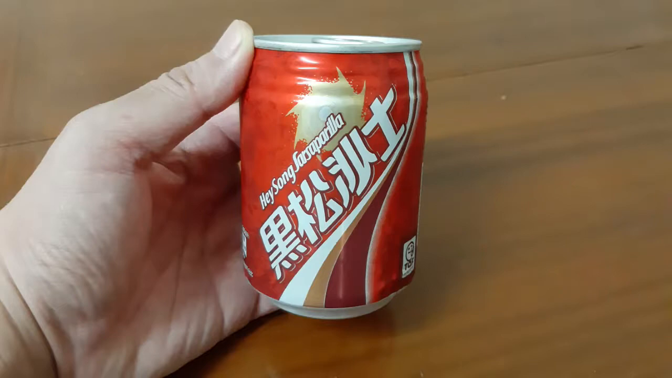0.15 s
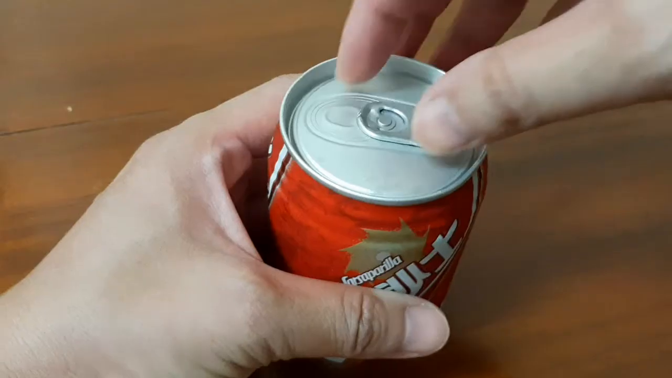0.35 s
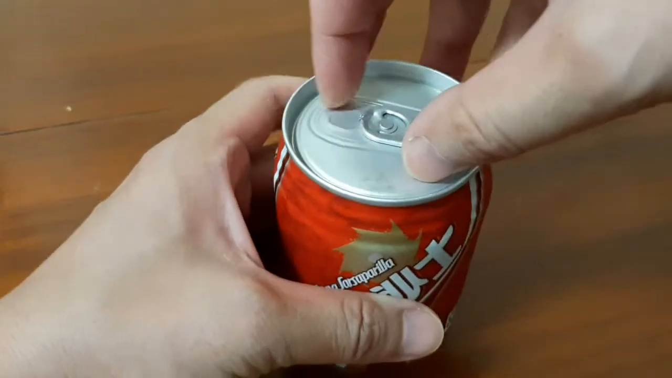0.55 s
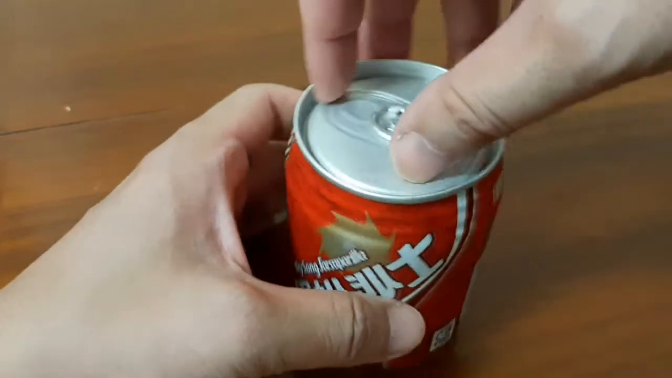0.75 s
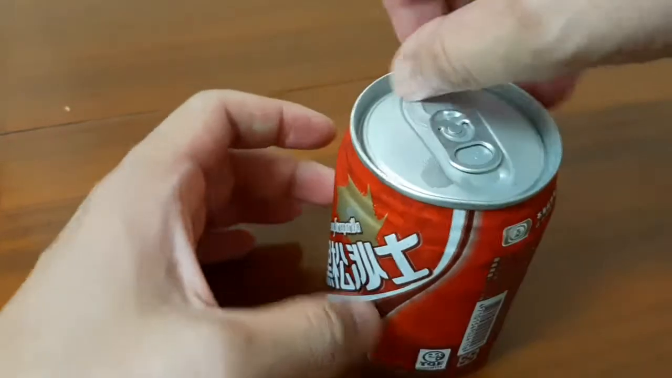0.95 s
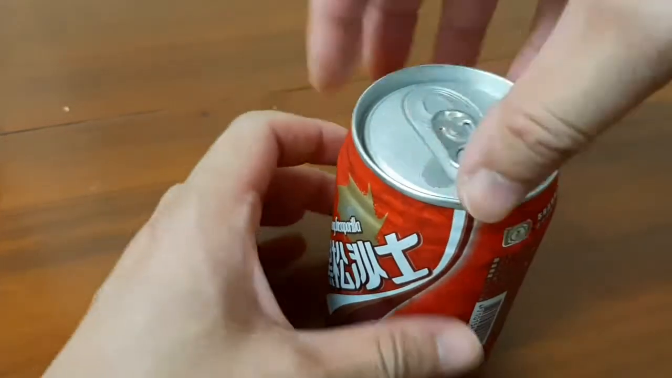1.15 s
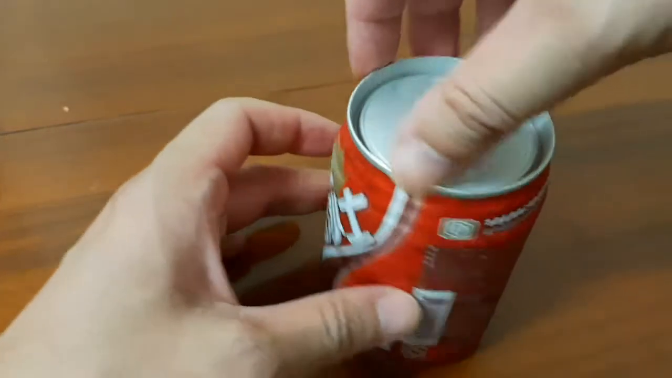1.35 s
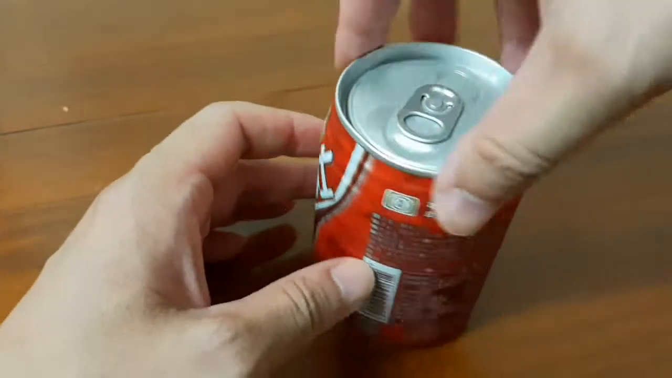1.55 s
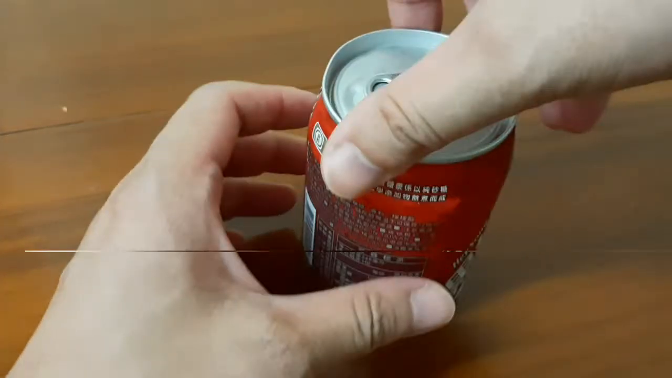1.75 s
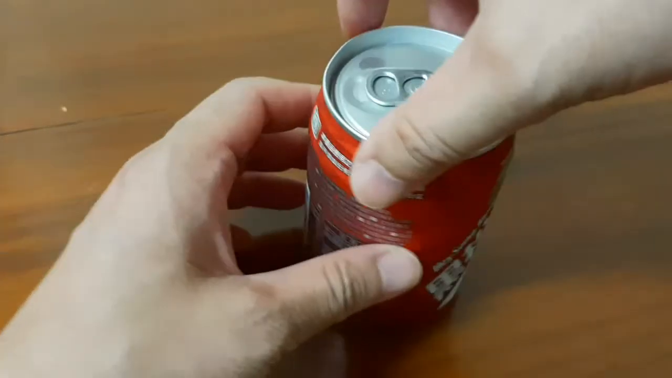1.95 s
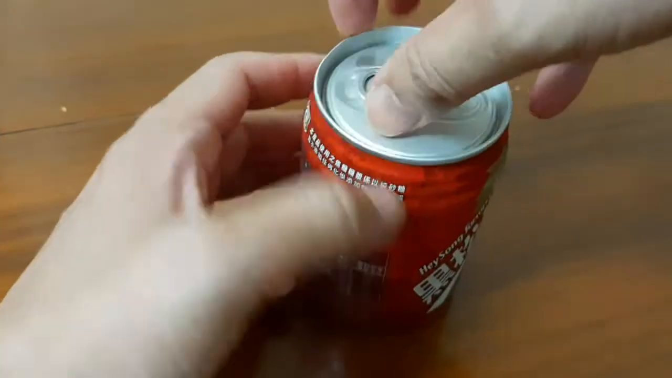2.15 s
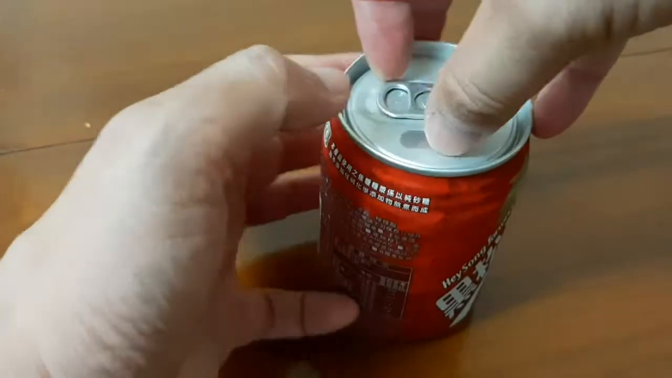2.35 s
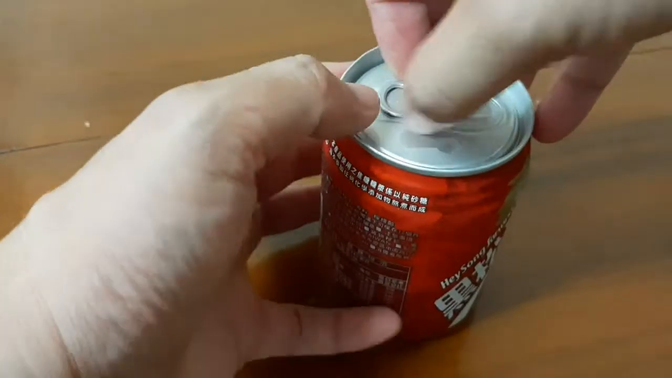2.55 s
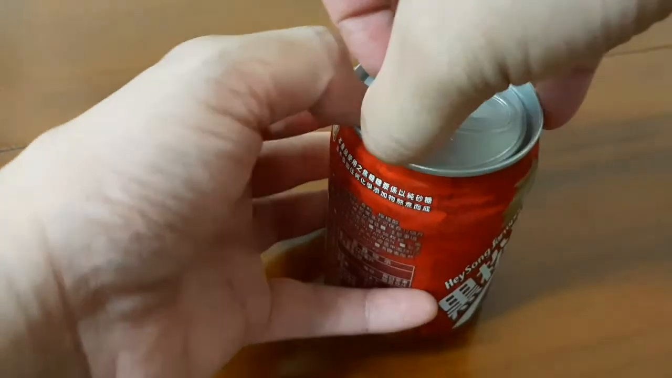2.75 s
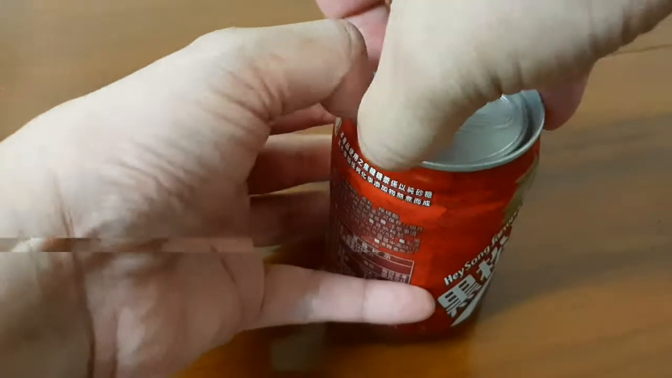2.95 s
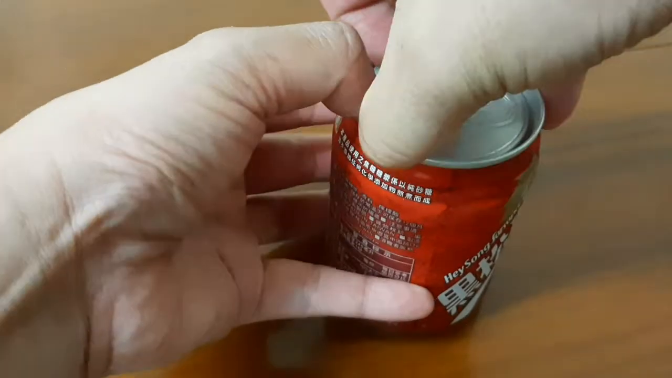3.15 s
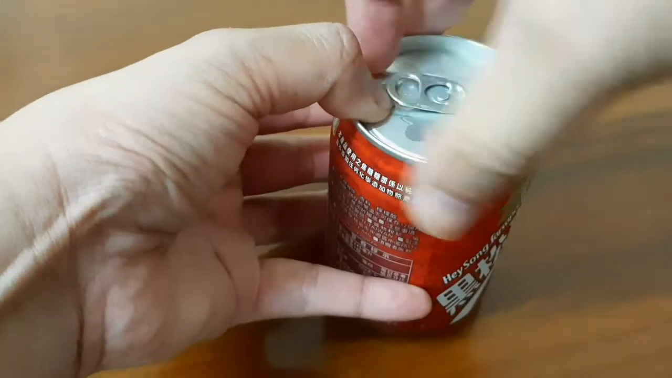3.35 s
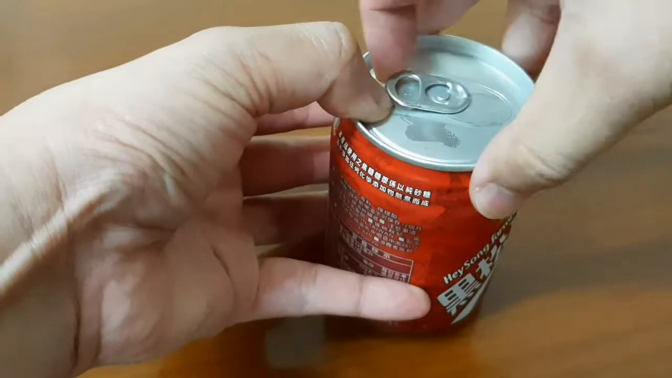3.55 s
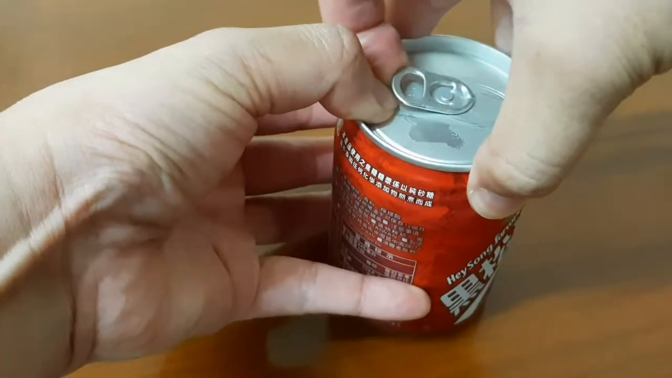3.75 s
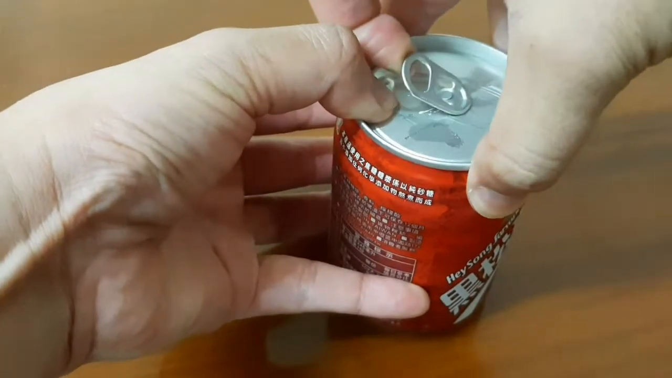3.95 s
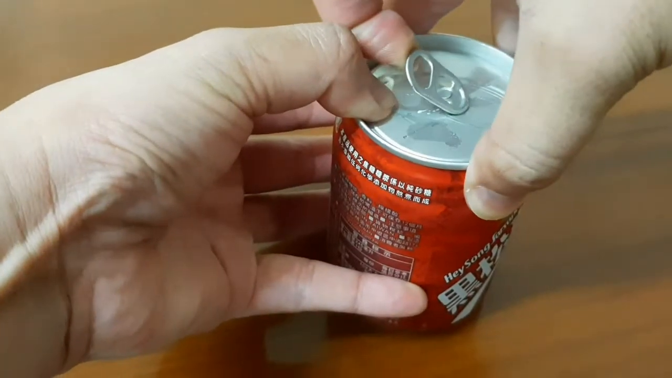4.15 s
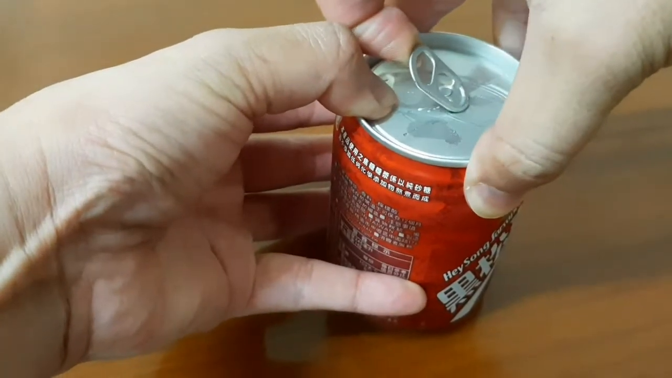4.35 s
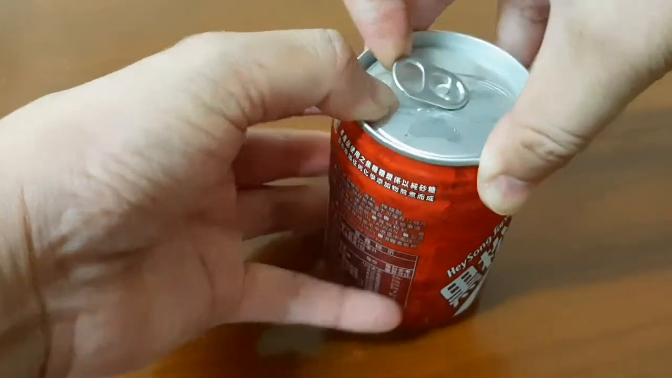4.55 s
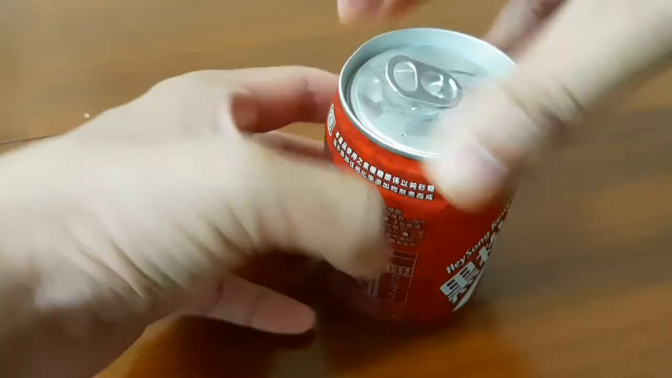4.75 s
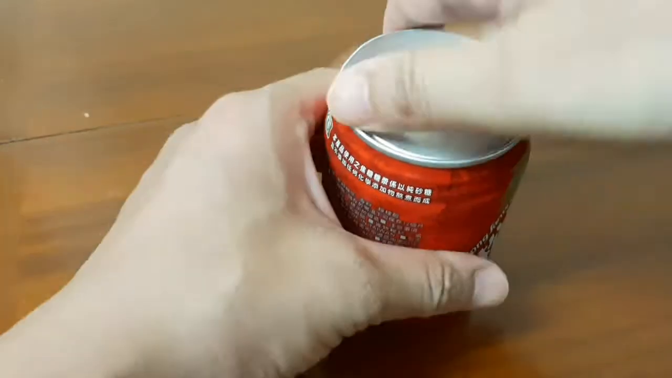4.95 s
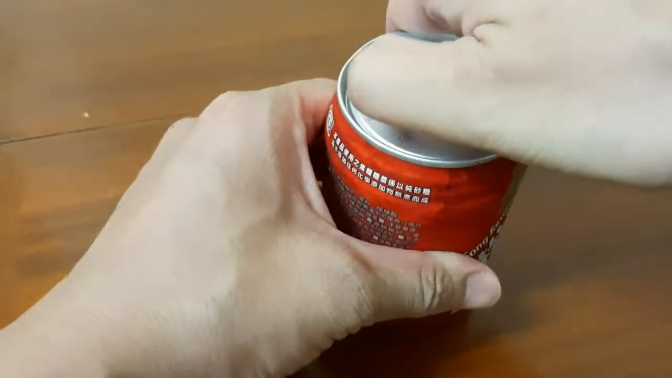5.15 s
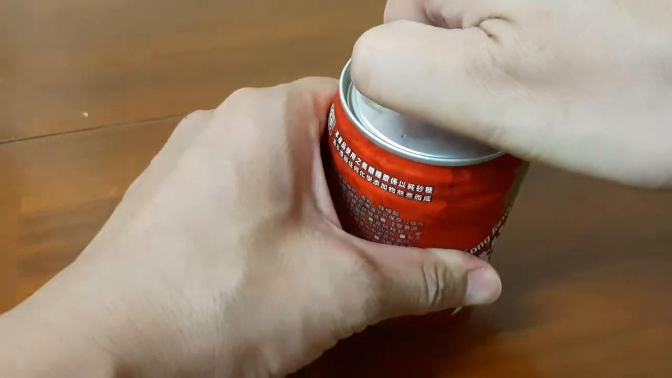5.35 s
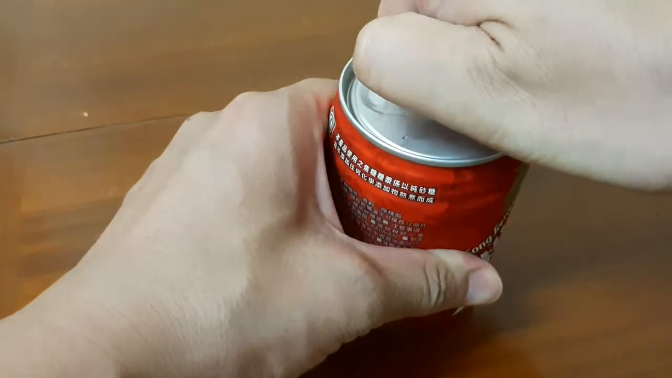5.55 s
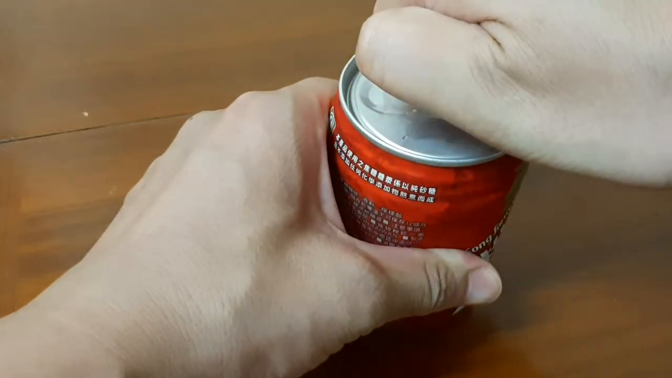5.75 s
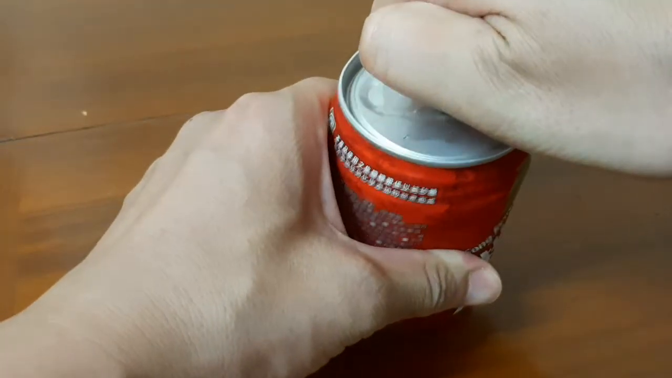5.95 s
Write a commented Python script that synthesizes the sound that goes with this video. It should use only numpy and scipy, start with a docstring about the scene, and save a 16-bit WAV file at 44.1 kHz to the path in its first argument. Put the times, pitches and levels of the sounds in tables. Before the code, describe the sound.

A faint, steady hum fills a small room, and everything happens close to the microphone. At about 0.5 seconds a soda can is set down on a wooden table with a knock and a short scrape. A sharp metallic tick follows at 0.9 seconds. Fingers softly rub the can as it is turned on the wood, and nails tick lightly on the tab between 2.4 and 3.4 seconds. At 3.85 seconds the seal cracks loudly, and a very short hiss of gas spits droplets at the microphone on the left. The sound dips for about a second while fingertips faintly tap the lid, until 5 seconds. From 5.5 seconds the tab gives three increasingly loud clicks as it is levered up. Near 5.95 seconds the lid tears open with a loud, quick metallic crunch and a brief hollow ring, leaving only the hum.

```python
"""A soda can on a wooden table in a small, humming room, close to a phone's two microphones.
The can is set down and turned on the wood; fingers rub its wall and nails tick on the tab.
Near 3.85 s the seal cracks, gas jets out and spits at the left microphone, and the phone turns
its gain down for a second. Fingertips tap the slack lid and the tab is levered up; near 5.95 s
it tears the lid open over the ringing headspace."""
import sys
import numpy as np
from scipy import signal
from scipy.fft import rfft, irfft, next_fast_len
from scipy.io import wavfile
from scipy.ndimage import uniform_filter1d

SR = 44100
rng = np.random.default_rng(int(sys.argv[2]) if len(sys.argv) > 2 else 0)


def wav_record(signal):
    """Record a signal, one row per channel, as 16-bit PCM in the file named by sys.argv[1]."""
    frames = np.transpose(np.atleast_2d(signal))
    bounded = np.clip(frames, -1, 1)
    # unit amplitude maps onto the largest positive 16-bit level
    quanta = np.round(bounded * 32767).astype(np.int16)
    wavfile.write(sys.argv[1], SR, quanta)


N = 265041
T = np.arange(N) / SR

# thin aluminium wall and lid under pressure: (frequency [Hz], width [Hz], gain [dB])
TAUT_CAN_MODES = [(1105, 43, 0.5), (1480, 270, -9.5), (2024, 95, 6.5), (2457, 170, 2.5), (2926, 88, -16.5),
                  (3444, 39, -10), (4070, 120, -2.5), (4640, 200, -2.5), (5626, 300, -10),
                  (6450, 220, -4.5), (7000, 250, -15.5), (10240, 520, -17.5), (12300, 1300, -16.5)]
# table top under the can: (frequency [Hz], width [Hz], gain [dB])
WOOD_MODES = [(257, 43, -4.5), (302, 23, -0.5), (457, 24, -2.5), (560, 180, -5.5), (760, 41.3, -3),
              (924, 280, -5), (1100, 170, 2), (1596, 110, -8.5), (2123, 74, -10), (2423, 300, -13),
              (3430, 250, -19.5)]


def undb(db):
    """Decibels to gain."""
    return 10 ** (np.asarray(db) / 20)


def unit(x):
    """Scale to rms 1."""
    return x / np.sqrt(np.mean(x ** 2))


def pan(db):
    """Microphone gains for a left-minus-right difference."""
    return undb(np.array([[db], [-db]]) / 2)


def pair(alike, size=N):
    """White noise at two microphones that share the fraction `alike` of its power."""
    shared = np.sqrt(alike) * rng.standard_normal(size)
    return shared + np.sqrt(1 - alike) * rng.standard_normal((2, size))


def colour(x, points):
    """Shape a sound with a spectrum of (frequency [Hz], gain [dB]) points."""
    hz, db = np.transpose(points)
    size = next_fast_len(x.shape[-1])
    bins_hz = np.maximum(np.fft.rfftfreq(size, 1 / SR), 1)
    gain = undb(np.interp(np.log(bins_hz), np.log(hz), db))
    return irfft(rfft(x, size) * gain, size)[..., :x.shape[-1]]


def band(x, hz, width):
    """One resonance, gain 1 at its centre."""
    return signal.lfilter(*signal.iirpeak(hz, hz / min(width, SR / 4), fs=SR), x)


def ring(force, modes):
    """A body's modes, driven by a force."""
    return sum(undb(db) * band(force, hz, width) for hz, width, db in modes)


def walk(rate_hz, size=N):
    """Smooth random wander with a spread near 1."""
    knots = rng.standard_normal(int(size / SR * rate_hz) + 2)
    return np.interp(T[:size] * rate_hz, np.arange(len(knots)), knots)


def contact(decay_s, alike, size=4096):
    """A dying burst of tiny slips."""
    return pair(alike, size) * np.exp(-T[:size] / decay_s)


def swells(strokes, shape=1.4):
    """A hand's effort: each stroke swells and eases off; shape 1 is pointed, 2 rounded."""
    return sum(undb(db) * np.exp(-np.abs((T - s) / np.where(T < s, swell, ease)) ** shape)
               for s, db, swell, ease in strokes)


def burst(start_s, attack_s, hold_s, release_s, db_per_s=0):
    """A linear attack, a sloping hold and an exponential release."""
    t = T - start_s - attack_s
    attack = np.clip(1 + t / attack_s, 0, 1)
    slope = undb(db_per_s * np.clip(t, 0, hold_s))
    return attack * slope * np.exp(-np.maximum(t - hold_s, 0) / release_s)


def add(out, s, x, db):
    """Mix in a short sound at time s with its loudest two milliseconds at the given level."""
    i = int(s * SR)
    loudest = np.sqrt(uniform_filter1d(np.mean(x ** 2, axis=0), size=88).max())
    out[:, i:i + x.shape[1]] += x[:, :N - i] * undb(db) / loudest


def room_tone(air_db=-58.5, waver_db=2):
    """Steady room air, alike at both microphones in the bass, with a wavering appliance hum."""
    # spectrum of the room's air: (frequency [Hz], gain [dB])
    air_spectrum = [(15, -54.5), (25, -24), (84, -12), (120, -6), (145, -11.5), (170, -7), (236, -10),
                    (317, -6), (354, -10.5), (818, -17), (1740, -37), (4490, -40), (5730, -35), (7920, -49),
                    (16000, -43.5)]
    # appliance tones, the two lowest beating: (frequency [Hz], level [dB])
    hum_tones = [(119.7, -63), (117.1, -65.5), (170, -69), (291.5, -72.5)]
    bass = colour(pair(alike=.8), [(400, -1), (900, -10), (2500, -14.5), (8000, -43.5)])
    treble = colour(pair(alike=.041), [(100, -27), (400, -11.5), (900, -1), (2000, 3)])
    air = unit(colour(bass + treble, air_spectrum)) * undb(air_db + walk(4.8))
    hum = sum(undb(db + waver_db * walk(9.7)) * unit(np.sin(2 * np.pi * hz * T + 1.4 * walk(6)))
              for hz, db in hum_tones)
    return air + hum


def reverb(x, wet_db=-6, low_t60=.49, high_t60=.52, build_s=.00091, size=30000):
    """Close bare walls return a dense tail about half a second long."""
    t = T[:size]
    noise = pair(alike=.21, size=size)
    low = signal.sosfilt(signal.butter(1, 600, fs=SR, output="sos"), noise)
    tail = low * undb(-60 * t / low_t60) + (noise - low) * undb(-60 * t / high_t60)
    tail = unit(tail * (1 - np.exp(-t / build_s))) / np.sqrt(size)
    wet = signal.oaconvolve(x, tail, axes=1)[:, :N]
    tone = [(100, .5), (300, 1.5), (900, 5), (2500, .5), (6000, 0), (10000, 1.5), (15500, -4.5)]
    return undb(wet_db) * colour(wet, tone)


def dragging(judder_db=4, force_hz=(240, 380)):
    """The can's foot judders as it is turned and sets the table's low modes droning."""
    # shoves over the wood: (time of fastest slide [s], level [dB], swell [s], ease [s])
    shoves = [(.527, -37, .032, 0.035), (.895, -45.5, 0.06, 0.062), (1.45, -60, 0.58, 0.37),
              (2.45, -60, 0.5, 0.36), (3.0, -57.5, 0.044, 0.031), (3.32, -57.5, 0.083, 0.086)]
    slips = pair(alike=.85) * undb(judder_db * walk(60))
    force = signal.sosfilt(signal.butter(2, force_hz, "band", fs=SR, output="sos"), slips)
    return unit(ring(force, WOOD_MODES)) * swells(shoves)


def knocks(crack_db=-27, grit=.19, radiated_hz=(190, 3200), size=24000):
    """The can's foot drives the table top, which radiates little deep bass."""
    # the foot lands, rocks and is jolted: (time [s], level [dB], contact time [s])
    impacts = [(0.4718, -21, 0.0007), (0.4783, -28, 0.00046), (.89, -42, 0.0059), (2.567, -47.5, 0.0024),
               (3.267, -42, 0.0004), (3.8492, -43, 0.0019)]
    out = np.zeros((2, N))
    radiation = signal.butter(2, radiated_hz, "band", fs=SR, output="sos")
    for s, db, contact_s in impacts:
        t = T[:size] / contact_s
        roughness = grit * (.001 / contact_s) ** 2  # a slow, soft contact has less grit
        force = t * np.exp(-2 * t) + roughness * contact(contact_s, alike=.85, size=size)
        knock = ring(force, WOOD_MODES) + undb(crack_db) * band(force, 1100, 2000)
        add(out, s, signal.sosfilt(radiation, knock), db)
    return out


def rubbing(grain_db=2.5, catch_db=2, skin_db=-9, press_power=.25):
    """Skin sticks and slips: a firm stroke rings the wall, fingertips on the lid only rustle."""
    # the hand on the wall: (time of firmest pressure [s], level [dB], swell [s], ease [s])
    wall_strokes = [(.53, -54.5, .13, 0.13), (.885, -49, 0.082, 0.038), (1.385, -53, 0.11, 0.051),
                    (1.67, -51, 0.099, 0.068), (1.97, -61.5, 0.15, 0.1), (4.63, -57, 0.08, 0.043),
                    (5.14, -61.5, .04, 0.045)]
    # fingertips feel for the tab: (time of firmest pressure [s], level [dB], swell [s], ease [s])
    lid_strokes = [(.885, -51.5, 0.048, 0.035), (2.4, -63.5, 0.26, 0.18), (2.675, -61.5, 0.053, 0.14),
                   (3.3, -68, 0.14, .14)]
    slips = pair(alike=.081) * undb(grain_db * walk(400) + catch_db * walk(35))
    effort = swells(wall_strokes)
    wall = ring(slips, TAUT_CAN_MODES)
    wall = unit(colour(wall, [(1100, -1.5), (2100, -.5), (3200, -5), (4300, -.5), (6500, -3.5)]))
    wall *= (effort / effort.max()) ** press_power
    skin = unit(colour(slips, [(600, -12.5), (1500, -7), (2500, -6), (3500, -1), (6700, -1.5),
                               (8500, -13.5), (16000, -17.5)]))
    tips = unit(colour(slips, [(1000, -13.5), (2200, -7), (3100, -11), (4400, -1), (7000, -.5),
                               (8500, -12), (16000, -15.5)]))
    friction = (wall + undb(skin_db) * skin) * effort + tips * swells(lid_strokes)
    return colour(friction, [(6500, -1), (8500, -7), (16000, -7)])


def strikes(events, modes, snap_db, slip=.62, spread=.84):
    """Sharp contacts and their slips snap the metal and ring it, each around its own centre."""
    # so small a body radiates poorly below its first modes
    radiation = [(300, -13), (1100, -6.5), (1900, -1), (7200, 4), (8800, -6), (11000, -1), (15500, -.5)]
    out = np.zeros((2, N))
    for s, db, hz, contact_s in events:
        force = slip * contact(contact_s, alike=.38)
        force[:, 0] += 1  # the impact itself
        force = band(force, hz, spread * hz)
        metal = ring(force, modes) + undb(snap_db) * band(force, hz, 2 * spread * hz)
        fade_out = np.linspace(1, 0, metal.shape[1]) ** 2  # fade each click's ring smoothly to silence
        add(out, s, colour(metal, radiation) * fade_out, db)
    return out


def finger_taps():
    """Fingertips shift on the lid, slack once the gas is out, and ring it faintly."""
    # fingertip contacts: (time [s], level [dB], centre [Hz], contact time [s])
    touches = [(4.11, -48.5, 1800, 0.0048), (4.201, -54.5, 1900, 0.0014), (4.554, -52, 2800, 0.0057),
               (4.588, -50, 2190, 0.017), (4.612, -56, 5000, 0.012), (4.66, -55.5, 5000, 0.0053),
               (4.945, -54.5, 2604, 0.0082), (4.968, -47, 1928, 0.016)]
    # slack lid: (frequency [Hz], width [Hz], gain [dB])
    slack_modes = [(1909, 74, 4), (2730, 225, -20.5), (4350, 254, -9.5), (5900, 460, -22),
                   (11920, 1200, -14)]
    return strikes(touches, slack_modes, snap_db=-45, slip=.79)


def nail_clicks():
    """Nails tick on the closed can and ring its taut metal."""
    # nail contacts: (time [s], level [dB], centre [Hz], contact time [s])
    ticks = [(.413, -46, 6300, 0.014), (.466, -46.5, 5850, 0.019), (.531, -50, 6900, 0.01),
             (0.8897, -24.5, 4700, 0.0038), (2.371, -43, 5800, 0.0018), (2.567, -46, 4800, 0.0032),
             (2.650, -55, 6300, .012), (2.683, -60, 6450, 0.0093), (3.208, -62, 6350, 0.0065),
             (3.232, -56, 6670, 0.015), (3.2447, -41, 5990, 0.0025), (3.2667, -39.5, 3400, 0.002),
             (3.361, -48, 4900, 0.0092)]
    return strikes(ticks, TAUT_CAN_MODES, snap_db=-14.5, spread=.88)


def tab_lever():
    """The tab bites as it is levered up and rings against the lid."""
    # bites of the tab: (time [s], level [dB], centre [Hz], contact time [s])
    bites = [(5.525, -40, 4760, 0.0013), (5.8242, -33.5, 3080, 0.0012), (5.9385, -24.5, 3360, 0.0014)]
    # tab pressed on the lid: (frequency [Hz], width [Hz], gain [dB])
    tab_modes = [(1960, 200, 7.5), (2420, 370, 4), (3110, 84, -3), (4400, 500, -11), (5290, 96, 4),
                 (7150, 380, -15.5), (10900, 800, -10)]
    return strikes(bites, tab_modes, snap_db=-37, spread=.79)


def seal_crack():
    """The seal gives under the tab's nose and rings the metal around the rivet."""
    # the single crack: (time [s], level [dB], centre [Hz], contact time [s])
    crack = [(3.8482, -15, 4310, 0.0016)]
    # stiff metal around the rivet: (frequency [Hz], width [Hz], gain [dB])
    rivet_modes = [(2597, 500, -10), (3570, 260, 1.5), (4000, 220, 0), (6550, 450, -7), (9900, 1300, -5.5),
                   (14100, 2500, -12)]
    return strikes(crack, rivet_modes, snap_db=-15.5)


def gas_jet(flow_db=-21.5, seep_db=-44.5, flutter_db=1.5, left_db=3):
    """Turbulent gas leaves the widening crack until the pressure is spent; a faint seep trails it."""
    # spectrum of the hiss: (frequency [Hz], gain [dB])
    hiss_spectrum = [(300, -19.5), (1000, -14.5), (2000, -4.5), (3000, -4), (4500, 0.5), (7000, -1.5),
                     (8500, -11), (11000, -1.5), (13000, 0), (15500, 0.5)]
    gas = unit(colour(pair(alike=.074), hiss_spectrum))
    opening = dict(start_s=3.859, attack_s=.003, hold_s=.072)
    flow = undb(flow_db) * burst(**opening, release_s=.008, db_per_s=23.5)
    seep = undb(seep_db) * burst(**opening, release_s=.028)
    return gas * undb(flutter_db * walk(500)) * (flow + seep) * pan(left_db)


def spray(start_s=3.868, gap_s=.0027, straggler_s=3.9172, spit_db=-7, gust_db=-22, right_db=-28):
    """A volley of droplets and one straggler hit the left microphone; the gust rumbles between them."""
    count, size = 13, 1024
    port = np.zeros(N)
    times = np.append(start_s + (np.arange(count) + .5) * gap_s, straggler_s)
    for s, (late, strong, long) in zip(times, rng.uniform(-1, 1, (count + 1, 3))):
        i = int((s + late * gap_s / 2) * SR)
        push_s = .0001 * np.exp(.7 * long)
        t = T[:size] / push_s
        spit = np.e * t * (2 - t) * np.exp(-t)  # the port's air is pushed in and swings back
        port[i:i + size] += undb(spit_db + 1.5 * strong) * spit
    rumble = [(40, -21), (70, -14), (130, 4.5), (400, -.5), (1500, -5.5), (4000, -11.5), (8000, -28)]
    gust = undb(gust_db) * unit(colour(rng.standard_normal(N), rumble))
    port += gust * burst(start_s, attack_s=.012, hold_s=.045, release_s=.004, db_per_s=-130)
    return port * undb([[0], [right_db]])


def jerks(start_s=5.9595, gap_s=.0065, decay_s=.0064, start_db=-17.5, fade_db_per_s=162, fold_s=5.972):
    """The score rips in weakening jerks: (time [s], level [dB], decay [s], thump [dB], pitch ratio)."""
    rows = []
    for k, (late, weak, higher) in enumerate(rng.uniform(-1, 1, (8, 3))):
        s = start_s + (k + .2 * late) * gap_s
        db = start_db - fade_db_per_s * (s - start_s) - weak
        thump_db = db + (-.5 if s > fold_s else -16)  # once folded, the loose lid thumps harder
        rows.append((s, db, decay_s, thump_db, 1 + .092 * higher))
    return rows


def tearing(rip_db=-17, thump_hz=650, grain_db=4, puff_db=-5):
    """Snaps and jerks ring the loosening lid at shifting pitch; its buckling thumps the headspace."""
    # the lid snaps along its score and folds in: (time [s], level [dB], decay [s], thump [dB])
    snaps = [(5.948, -10.5, .0022, -31.5), (5.9523, -9, .0009, -20.5), (5.967, -15.5, 0.0021, -24),
             (5.9726, -24, 0.0038, -14)]
    # the tearing lid with the air under it: (frequency [Hz], width [Hz], gain [dB])
    lid_modes = [(139, 56, -11.5), (280, 25, -9.5), (815, 86, -4), (966, 120, -2), (2160, 100, -5),
                 (2350, 130, 6), (2870, 240, 5.5), (3600, 360, -5), (4553, 120, 8.5), (4960, 220, -30),
                 (6660, 1000, -21), (10300, 2500, -16)]
    out = np.zeros((2, N))
    for s, db, decay_s, thump_db, pitch_ratio in [(*snap, 1) for snap in snaps] + jerks():
        force = contact(decay_s, alike=.14)
        force *= undb(grain_db * walk(2450, size=force.shape[1]))
        shifted_modes = [(hz * pitch_ratio, width, gain_db) for hz, width, gain_db in lid_modes]
        add(out, s, ring(force, shifted_modes) + undb(rip_db) * band(force, 3000, 1700), db)
        push = contact(.00076, alike=.91)
        push[:, 0] += 4  # the lid buckles
        push = band(band(push, thump_hz, 2000), thump_hz / 2, 1150)
        add(out, s, ring(push, lid_modes) + undb(puff_db) * push, thump_db)
    return out


def scene(tap_send_db=-10, click_send_db=-3):
    """Can and hands at close range; small contacts stir the room less, and the spray not at all."""
    can = knocks() + dragging() + rubbing() + gas_jet() + tearing()
    clicks = nail_clicks() + seal_crack() + tab_lever()
    taps = finger_taps()
    walls = reverb(can + undb(click_send_db) * clicks + undb(tap_send_db) * taps)
    return can + clicks + taps + walls + spray() + room_tone()


def gain_control(x, limit_db=-24, depth_db=12, hold_s=.92, glide_s=.42):
    """A loud sound turns the phone's gain down; it stays down for a while and glides back."""
    power = uniform_filter1d(np.mean(x ** 2, axis=0), size=882)  # over 20 ms
    loud = power > undb(limit_db) ** 2
    since_loud_s = T - np.maximum.accumulate(np.where(loud, T, -np.inf))
    held_s = np.cumsum(since_loud_s < hold_s) / SR
    held_share = (held_s - np.interp(T - glide_s, T, held_s)) / glide_s  # of the last glide_s
    return x * undb(-depth_db * held_share)


def record(dry, open_s=.409, top_hz=16000):
    """The phone's input opens after a moment, rides its gain, clips at full scale and cuts the top."""
    fade_in = np.clip((T - open_s) / .0025, 0, 1)
    x = np.clip(gain_control(dry), -1, 1) * fade_in
    return signal.sosfilt(signal.ellip(10, .2, 70, top_hz, fs=SR, output="sos"), x)


dry = scene()
out = record(dry)
wav_record(out)
```